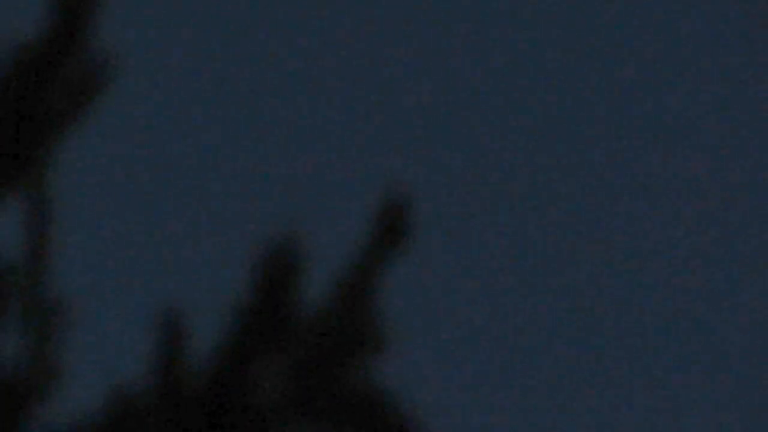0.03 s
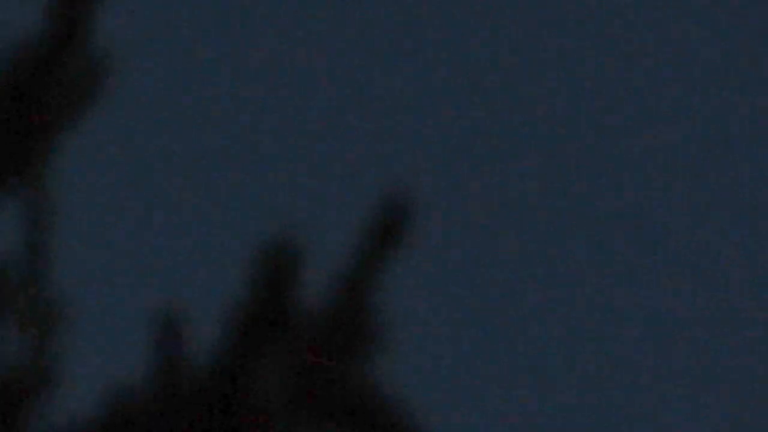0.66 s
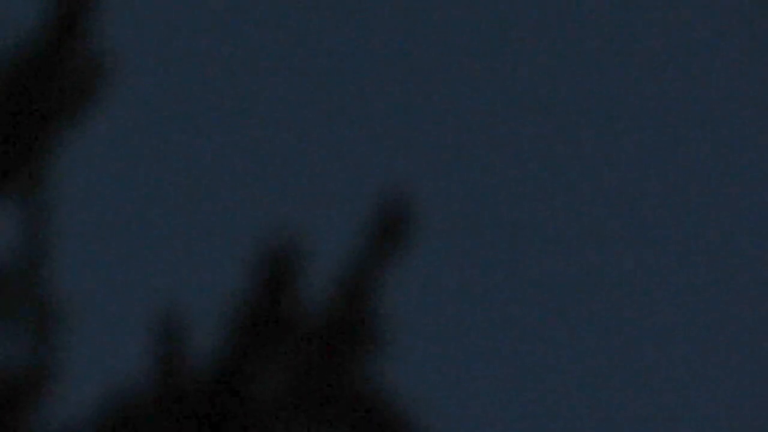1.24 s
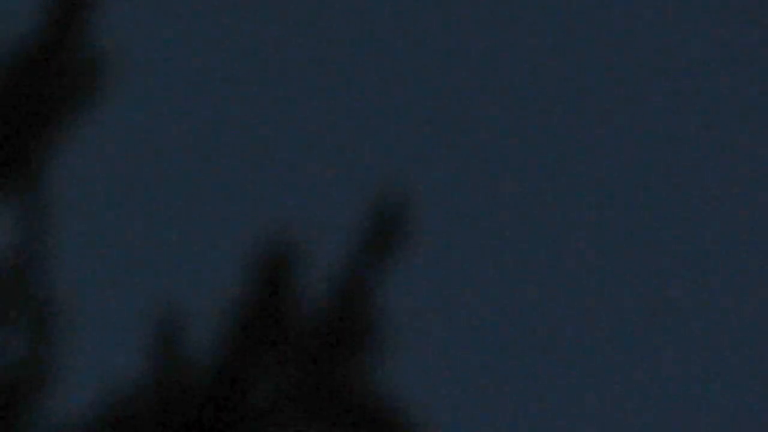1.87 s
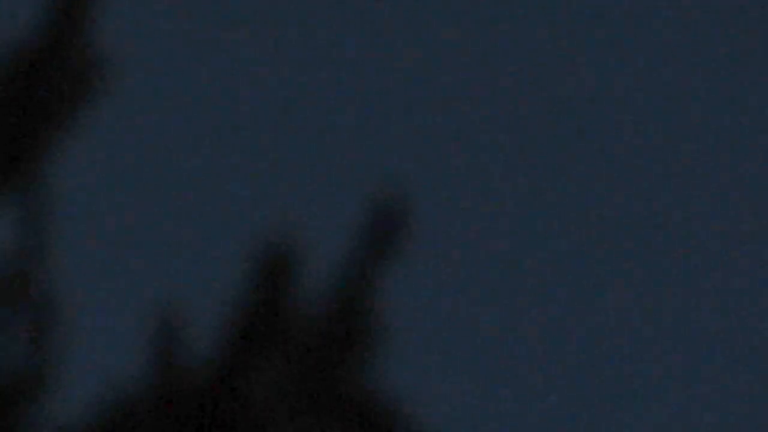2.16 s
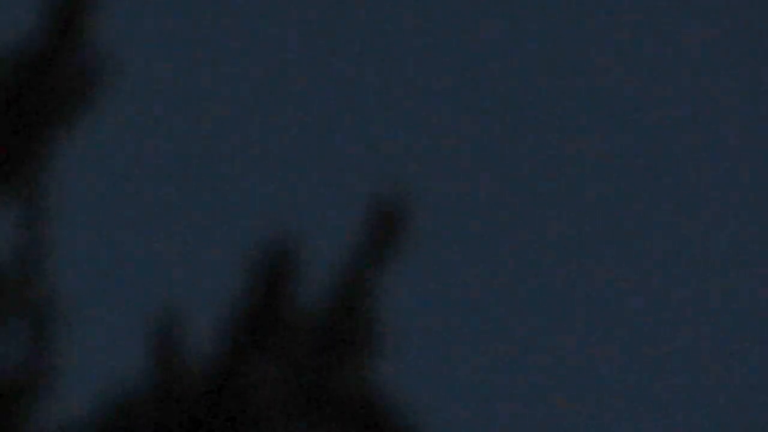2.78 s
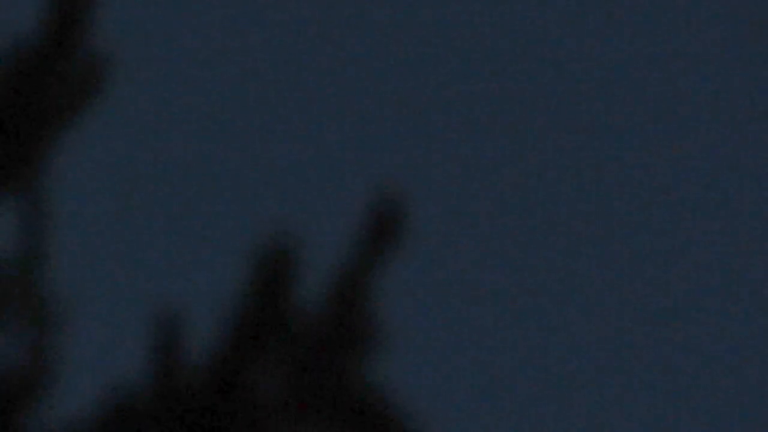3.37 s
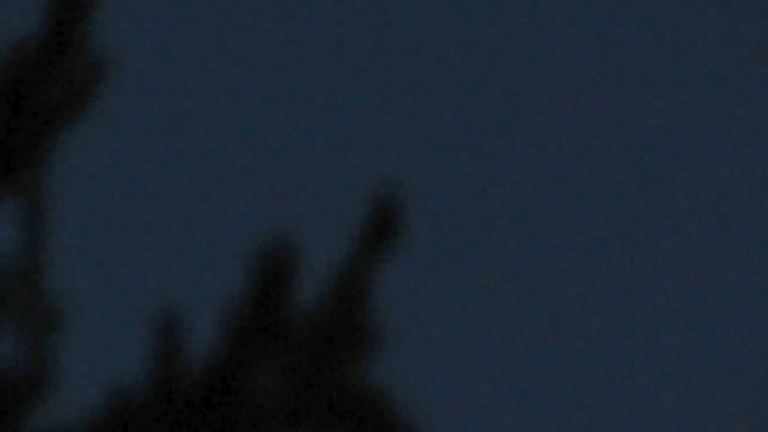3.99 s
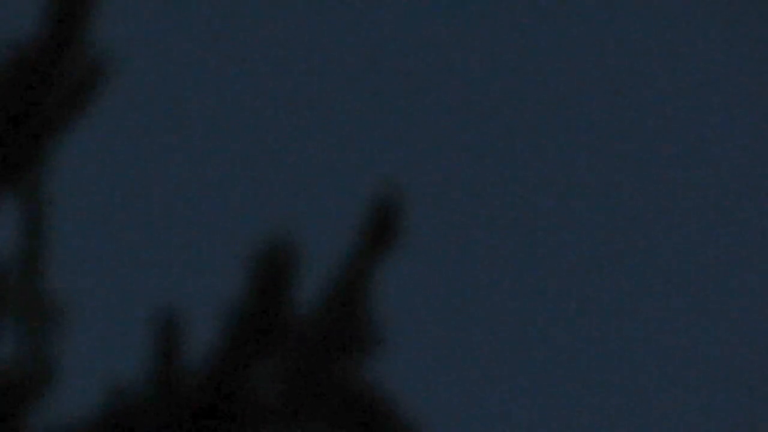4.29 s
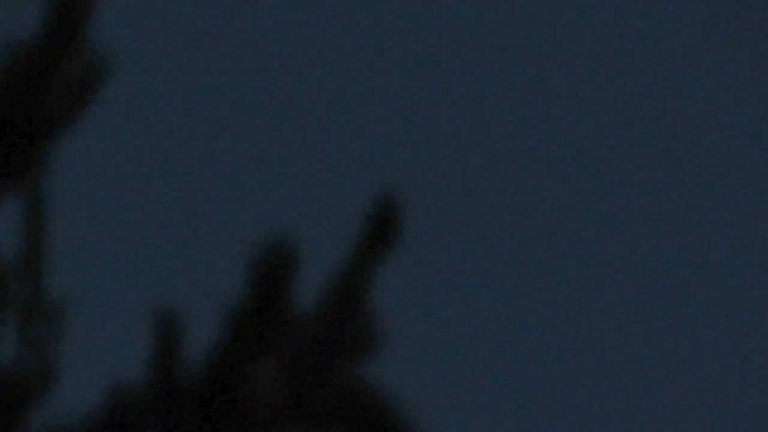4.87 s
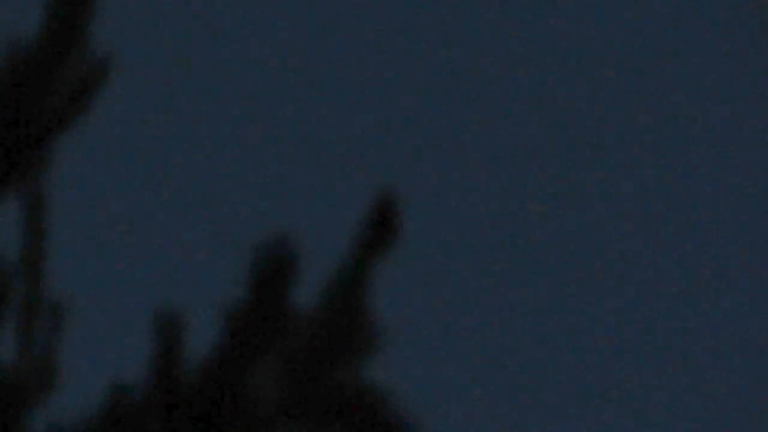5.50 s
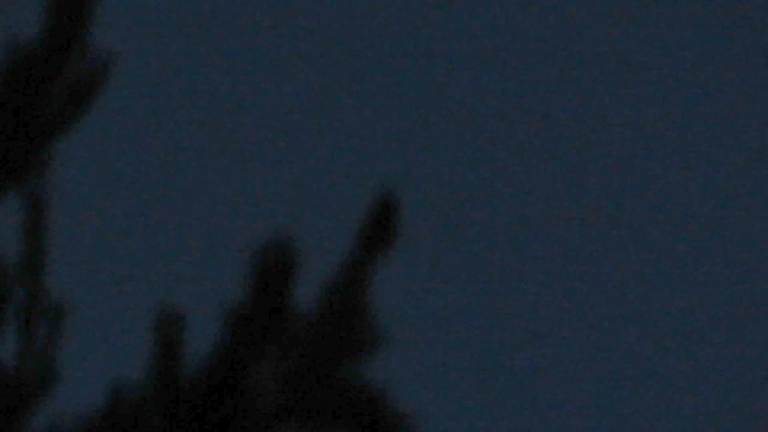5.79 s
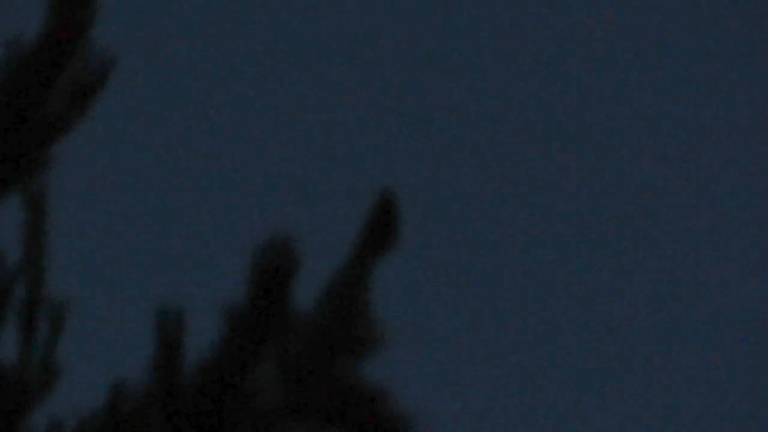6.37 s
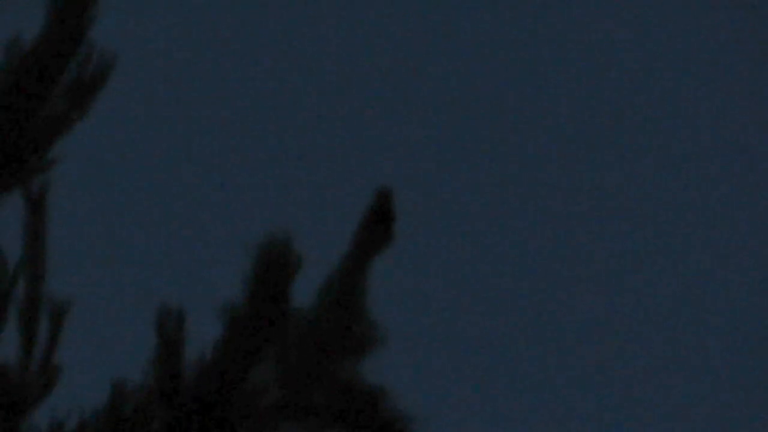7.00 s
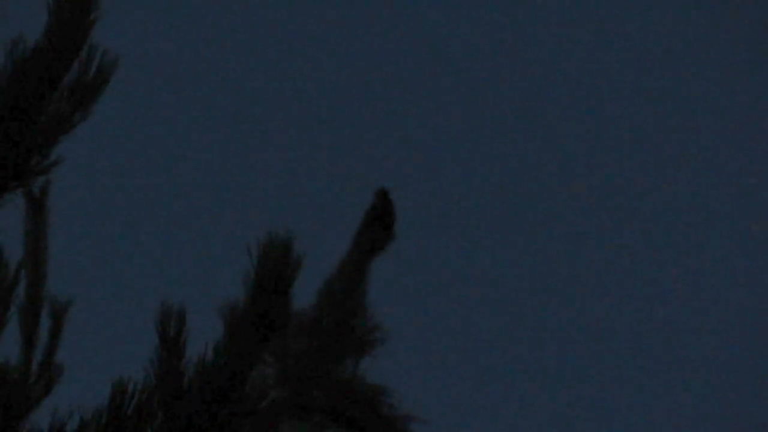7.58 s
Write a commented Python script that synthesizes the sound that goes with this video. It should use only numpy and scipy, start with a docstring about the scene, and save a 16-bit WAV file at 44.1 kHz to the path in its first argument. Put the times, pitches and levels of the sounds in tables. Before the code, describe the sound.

A nightjar churrs without a break for nearly eight seconds, a rapid, even trill of tiny notes with a slight echo from the surrounding trees. From about 0.6 to 1.1 seconds it drops to a softer, lower, quicker trill, then holds the full churr until 7 seconds. It softens again and returns to full strength at about 7.5 seconds.

Close to the microphone, a hand scuffs and knocks on the camera between 1.1 and 1.3 seconds. Small dry ticks and a faint sleeve rustle follow at around 2.1 to 2.4 seconds, with more light ticks from 4.3 to 4.8. Faint bumps come near 3.4 and 5.6 seconds, soft cloth brushing with very faint thin squeaks between 6 and 7, and a last small scuff near 7.4. A steady low rumble and hiss, with a barely audible camera motor hum, continue throughout.

```python
"""Nightjar at dusk

A nightjar churrs from a treetop: a pulse train of tiny falling whistles, about 27 a second, twice
dropping to a softer, lower, quicker trill. Branches reflect each note and the trees scatter it.
Close by, a hand scuffs, knocks and ticks on a camera and a sleeve brushes, over a steady rumble
and hiss and the faint hum of the camera's motor."""
import sys
import numpy as np
from scipy import signal
from scipy.fft import rfft, irfft
from scipy.io import wavfile

SR = 44100
rng = np.random.default_rng(int(sys.argv[2]) if len(sys.argv) > 2 else 0)


def file_out(sig):
    """Save sig as 16-bit WAV at sys.argv[1]."""
    # one column per channel
    cols = np.atleast_2d(sig).T
    # limit, then scale
    lim = np.clip(cols, -1, 1)
    pcm = np.round(lim * 32767).astype(np.int16)
    wavfile.write(sys.argv[1], SR, pcm)


N = 337365
TIME = np.arange(N) / SR


def from_db(db):
    """Amplitude ratio: a factor of ten for every 20 dB."""
    return 10 ** (np.asarray(db) / 20)


def unit_rms(x):
    """Normalisation to unit mean power."""
    return x / np.sqrt(np.mean(x ** 2) + 1e-20)


def curve_at(rows, at):
    """Linear interpolation of a two-column curve."""
    return np.interp(at, *np.transpose(rows))


def noise(spectrum, size=N):
    """Spectral shaping: white noise weighted by rows of frequency_hz, density_db."""
    hz, db = np.transpose(spectrum)
    bins_hz = np.maximum(np.fft.rfftfreq(size, 1 / SR), 1)
    gain = from_db(np.interp(np.log(bins_hz), np.log(hz), db))
    return irfft(rfft(rng.standard_normal(size)) * gain, size) * np.sqrt(SR / 2)


def stereo(mid, side):
    """Sum and difference: left and right from their common and opposed parts."""
    return np.array([mid + side, mid - side])


def wide_noise(spectrum, side_db):
    """Partial coherence: a common noise of unit power and an independent opposed one."""
    return stereo(unit_rms(noise(spectrum)), from_db(side_db) * unit_rms(noise(spectrum)))


def drift(rate_hz):
    """Random modulation: standard normal values joined by straight lines."""
    knots = np.arange(0, TIME[-1] + 1, 1 / rate_hz)
    return np.interp(TIME, knots, rng.standard_normal(len(knots)))


def resonate(x, hz, width_hz):
    """Second-order resonance with unit gain at its peak."""
    radius = np.exp(-np.pi * width_hz / SR)
    feedback = [1, -2 * radius * np.cos(2 * np.pi * hz / SR), radius ** 2]
    return signal.lfilter(np.array([1, 0, -1]) * (1 - radius ** 2) / 2, feedback, x)


# Pace of the "loud" and "soft" manners of churring: notes_per_s, slowing_ratio
CHURR_PACE = {"loud": (27.3, .019), "soft": (37.6, .07)}
# Swell into a loud phrase: time_constant_s, loss_db, fullness_loss
PHRASE_SWELL = (0.077, 3.1, .4)
# Fade out of a loud phrase: time_constant_s, loss_db, fullness_loss
PHRASE_FADE = (0.038, 4.5, .35)

def phrase(first_s, last_s, manner, opening_db, closing_db):
    """A slightly slowing pulse train: rows of time_s, level_db, fullness (vocal effort, 0 to 1)."""
    rate, slowing = CHURR_PACE[manner]
    progress = np.linspace(0, 1, round((last_s - first_s) * rate) + 1)
    time_s = first_s + (last_s - first_s) * (progress - slowing * progress * (1 - progress) / 2)
    level_db = opening_db + (closing_db - opening_db) * progress
    if manner == "loud":
        fullness = .96
        edges = (time_s - first_s, PHRASE_SWELL), (last_s - time_s, PHRASE_FADE)
        for from_edge_s, (ease_s, loss_db, thinning) in edges:
            slack = np.exp(-from_edge_s / ease_s)
            level_db = level_db - loss_db * slack
            fullness = fullness - thinning * slack
    else:
        fullness = .023 + .12 * progress  # the soft trill climbs in pitch
    return np.column_stack([time_s, level_db, np.clip(fullness, 0, 1)])


# Phrases, sung without a break: first_note_s, last_note_s, manner, opening_db, closing_db
SONG_PHRASES = [(-.1612, .5362, "loud", -22, -22.8), (.5753, 1.079, "soft", -33, -27.3),
                (1.1083, 6.9666, "loud", -22, -23), (6.9948, 7.4205, "soft", -29, -26.8),
                (7.4533, 7.814, "loud", -22, -22.5)]
# The bird pushes and drags the beat in its long phrase: time_s, lag_s
BEAT_LAG = [(1.11, 0), (2.09, -.0025), (2.3, -.0052), (3.19, .002), (4.06, .0028), (5.05, .002),
            (5.93, .0009), (6.82, .0057), (6.97, 0)]

def song(swallowed_s=7.151, swallowed_loss_db=8):
    """Timing modulation: the phrases follow a wandering beat, and one note is nearly swallowed."""
    notes = np.vstack([phrase(*row) for row in SONG_PHRASES])
    time_s, level_db, fullness = notes[notes[:, 0] > 0].T
    level_db[np.argmin(abs(time_s - swallowed_s))] -= swallowed_loss_db
    return np.array([time_s + curve_at(BEAT_LAG, time_s), level_db, fullness])


# Contour of a full note, a short hook and a plunge: age_s, pitch_hz
NOTE_CONTOUR = [(0, 2470), (.0012, 2670), (.0022, 2730), (.0032, 2610), (.0042, 2440), (.0062, 2130),
                (.0082, 1740), (.0102, 1400), (.0122, 1260), (.015, 1130)]
# Standard deviations from note to note: length_ratio, span_ratio, level_db, timing_s
NOTE_SPREAD = (.07, .024, .5, .0002)
# Time a note takes to open: weak_s, full_s
NOTE_ATTACK = (.0036, .0015)
# The whistle is loudest in the middle of its range: pitch_hz, gain_db
WHISTLE_RESPONSE = [(1130, -50.5), (1250, -22), (1400, -13), (1760, -8), (2140, 1), (2450, -4.5),
                    (2750, -5)]
# Faint overtones at the top of the sweep: harmonic_number, level_db
WHISTLE_HARMONICS = [(2, -25), (3, -30.5), (5, -33)]
# Two throat resonances and the hollow between them: centre_hz, width_hz, gain_db
THROAT_FORMANTS = [(2258, 39, 3.5), (2307, 35, -1), (2629, 69, 4.5)]

def nightjar():
    """Source and filter: a whistle sweeps down about an octave in 10 ms, through fixed resonances."""
    centre_s, level_db, fullness = song()[:, :, None]
    spread = rng.standard_normal((len(centre_s), 4)) * NOTE_SPREAD
    stretch, detune, accent_db, late_s = spread.T[:, :, None]
    # with more effort a note starts earlier and higher, and lasts longer
    lead_s = np.interp(fullness, (0, 1), (.0042, .0062))
    span_ratio = np.interp(fullness, (0, 1), (.738, 1)) * (1 + detune)
    length_ratio = np.interp(fullness, (0, 1), (.889, 1)) * (1 + stretch)
    age = np.arange(SR // 55) / SR
    sweep_hz = curve_at(NOTE_CONTOUR, age / length_ratio)
    lowest_hz = NOTE_CONTOUR[-1][1]
    pitch_hz = lowest_hz + (sweep_hz - lowest_hz) * span_ratio
    # a relaxed throat favours lower pitches and opens more gently
    throat_ratio = np.interp(fullness, (0, 1), (.92, 1))
    response_db = curve_at(WHISTLE_RESPONSE, pitch_hz / throat_ratio)
    attack_s = np.interp(fullness, (0, 1), NOTE_ATTACK)
    opening = np.sin(np.pi / 2 * np.clip(age / attack_s, 0, 1)) ** 2
    phase = 2 * np.pi * np.cumsum(pitch_hz, axis=1) / SR
    # overtones belong to the forceful top of the note
    force = (pitch_hz / sweep_hz.max()) ** 3
    overtones = force * sum(from_db(db) * np.sin(k * phase) for k, db in WHISTLE_HARMONICS)
    notes = (np.sin(phase) + overtones) * opening * from_db(level_db + response_db + accent_db)
    samples = np.round((centre_s - lead_s + late_s) * SR).astype(int) + np.arange(len(age))
    voice = np.bincount(np.clip(samples, 0, N).ravel(), notes.ravel(), N + 1)[:N]
    colour = sum((from_db(db) - 1) * resonate(voice, hz, width) for hz, width, db in THROAT_FORMANTS)
    return voice + colour


# Reflections from nearby branches: delay_s, gain_db
BRANCH_ECHOES = [(.0034, -11.5), (.0083, -20), (0.012, -20), (0.022, -25.5), (0.028, -26)]
# Spectrum of the scatter from the trees: frequency_hz, relative_db
TREE_SPECTRUM = [(1000, 32), (1400, -7), (1900, -3.5), (2250, 2), (2420, 7), (2650, 10), (3000, 12),
                 (6000, -17), (14000, -12)]

def woodland(voice, scatter_db=-14.5, side_db=-4.5, t60_s=.79, sway_s=.00039, pan_db=.6):
    """Reflection and scattering: swaying branches return echoes, and the trees a diffuse tail."""
    echoes = np.zeros(N)
    for delay_s, db in BRANCH_ECHOES:
        emitted_s = TIME - delay_s - sway_s * drift(.97)
        echoes += from_db(db) * np.interp(emitted_s, TIME, voice, left=0)
    age = np.arange(SR) / SR
    fade = from_db(-60 * age / t60_s) * np.clip(age * 100, 0, 1)
    tails = [signal.fftconvolve(voice, noise(TREE_SPECTRUM, size=SR) * fade)[:N] for _ in range(2)]
    mid, side = [unit_rms(tail) * np.std(voice) * from_db(scatter_db) for tail in tails]
    return stereo(voice + echoes + mid, side * from_db(side_db)) * from_db([[-pan_db], [pan_db]])


# Faint hum of the camera's motor: centre_hz, width_hz, rms_db
MOTOR_BANDS = [(495.4, 29, -73), (586.6, 17, -67), (773.5, 63, -64)]

def motor_hum():
    """Narrow-band noise: the camera's motor hums faintly at three unsteady pitches."""
    hum = np.zeros(N)
    for hz, width_hz, db in MOTOR_BANDS:
        band = resonate(rng.standard_normal(N), hz, width_hz)
        hum += from_db(db) * unit_rms(resonate(band, hz, width_hz))
    return hum


# Spectral density of night air and microphone hiss: frequency_hz, common_db, opposed_db
AIR_SPECTRUM = [(15, -79.5, -85), (33.4, -72, -79), (44, -73.5, -77), (57, -67, -64), (82, -74, -85.5),
                (101.7, -74, -71), (176.5, -83.5, -70.5), (382, -84, -74), (780, -85.5, -79),
                (1036, -89, -83.5), (1980, -78, -84.5), (2870, -92.5, -91.5), (6060, -96, -96.5),
                (8660, -100, -101), (11400, -104, -105), (13600, -110, -111), (15300, -122, -123)]

def night_air():
    """Stationary noise: broadband rumble and hiss, wide in the low middle."""
    air = np.array(AIR_SPECTRUM)
    return stereo(noise(air[:, [0, 1]]), noise(air[:, [0, 2]]))


def bursts(starts_s, levels_db, t60s, attack_s=.0004):
    """Incoherent addition: the envelope of quickly rising, decaying contacts whose powers sum."""
    power = np.zeros(N + SR)
    age = np.arange(SR // 8) / SR
    rise = 1 - np.exp(-age / attack_s)
    for start_s, db, t60_s in zip(starts_s, levels_db, t60s):
        start = int(start_s * SR)
        power[start:start + len(age)] += (from_db(db - 60 * age / t60_s) * rise) ** 2
    return np.sqrt(power[:N])


# Scuffs of the hand: slip_s, run_up_s, relative_db, thud_offset_db, hiss_offset_db, t60_s
HAND_SCUFFS = [(1.14, .014, -19.5, -4, 0, .025), (1.1745, .005, -27, -9, 0, .035),
               (1.2525, .018, -20.5, -4, 2, .025), (1.281, .004, -35, 0, 4, .025),
               (2.3627, 0, -44, 3, 0, .03), (3.356, 0, -45, -6, -8, .071), (3.395, 0, -47, -2, -8, .049),
               (5.526, 0, -50, -1, -8, .03), (5.564, 0, -42, -1, -9, .041), (7.42, 0, -29, -17, -11, .05),
               (7.461, .015, -33, -18, -9, .03)]

def jerks(spacing_s=.005, jitter_s=.0006, spread_db=3, run_up_loss_db=3, run_up_t60_s=.019,
          trail_s=.006, trail_loss_db=8):
    """Stick-slip motion: a run-up of weak jerks, if any, then one firm slip and two dying ones."""
    rows = []
    for slip_s, run_up_s, db, thud_db, hiss_db, t60_s in HAND_SCUFFS:
        for early_s in np.linspace(run_up_s, 0, round(run_up_s / spacing_s), endpoint=False):
            late_s, accent_db = rng.standard_normal(2) * (jitter_s, spread_db)
            jerk_db = db - run_up_loss_db + accent_db
            rows.append((slip_s - early_s + late_s, jerk_db, thud_db, hiss_db, run_up_t60_s))
        for k in range(3):
            rows.append((slip_s + k * trail_s, db - k * trail_loss_db, thud_db, hiss_db, t60_s))
    return rows


# Rasp of skin on the housing: frequency_hz, relative_db
RASP_SPECTRUM = [(300, -15), (1200, -5.5), (2500, 2), (3400, 0), (4400, -2.5), (5900, 0.5), (6900, -3.5),
                 (9000, -19), (15000, -50)]
# Bright friction hiss, of skin and of cloth: frequency_hz, relative_db
HISS_SPECTRUM = [(3000, -35), (6500, -9), (8700, 3), (11000, -2), (13500, -6.5), (15500, -31)]
# Thud of the camera body: frequency_hz, relative_db
THUD_SPECTRUM = [(60, -22), (150, -14), (450, -13), (720, -10), (1020, 1), (1400, -6), (1900, 1),
                 (2700, -1), (3800, -16), (8000, -35)]

def scuffs(rasp_gain_db=2.5, thud_gain_db=5, grain_db=1):
    """Friction noise: each jerk of skin on the housing excites a grainy rasp, a hiss and a thud."""
    start_s, db, thud_db, hiss_db, t60_s = np.transpose(jerks())
    grain = from_db(grain_db * drift(2000))
    rasp = wide_noise(RASP_SPECTRUM, side_db=-16) * bursts(start_s, db + rasp_gain_db, t60_s)
    hiss = wide_noise(HISS_SPECTRUM, side_db=-7) * bursts(start_s, db + hiss_db, t60_s)
    thud = wide_noise(THUD_SPECTRUM, side_db=-25) * bursts(start_s, db + thud_db + thud_gain_db, t60_s)
    return (rasp + hiss) * grain + thud


# Modes of the housing: frequency_hz, level_db, t60_s
HOUSING_MODES = [(610, -16, .045), (790, -11, .04), (1020, -8, .025), (1450, -8, .01), (1880, -2, .01),
                 (2600, -5, .008), (5900, -8, .005)]
# A finger strikes the housing: start_s, gain_db
FINGER_KNOCKS = [(1.1405, -16.5), (1.1745, -35), (1.2535, -25), (1.286, -34), (2.366, -36), (5.566, -42)]

def knocks():
    """Modal ringing: a hard contact sets the housing vibrating as a sum of damped sinusoids."""
    out = np.zeros(N)
    age = np.arange(SR // 20) / SR
    ring = sum(from_db(db - 60 * age / t60_s) * np.cos(2 * np.pi * hz * age)
               for hz, db, t60_s in HOUSING_MODES)
    for start_s, db in FINGER_KNOCKS:
        start = int(start_s * SR)
        out[start:start + len(ring)] += from_db(db) * ring
    return out


# Small dry ticks of the housing: start_s, relative_db, centre_hz, t60_s, rebound_db
HOUSING_TICKS = [(1.678, -48, 5070, 0.017, -2), (1.89, -42, 8000, 0.0092, -10),
                 (2.2395, -33, 8500, 0.009, -12), (2.3004, -24.5, 7870, 0.0045, -22),
                 (2.363, -37, 9000, .015, -4), (2.379, -46, 10400, .012, -8), (4.259, -40, 8450, .01, 3.5),
                 (4.317, -32, 8700, 0.0073, -7), (4.364, -37, 8500, 0.006, 2.5),
                 (4.431, -50, 12000, 0.0093, -8), (4.738, -42.5, 9700, 0.0091, 5.5),
                 (4.8098, -41.5, 7500, 0.0084, 8.5), (5.603, -42, 7960, 0.012, -8),
                 (6.688, -40, 8140, 0.011, -18)]

def ticks(width_hz=8500, side_db=-8, gain_db=2.5, rebound_s=.003, cutoff_hz=11500):
    """Impact and rebound: two brief contacts in quick succession make a bright, broadband click."""
    out = np.zeros((2, N))
    age = np.arange(SR // 20) / SR
    for start_s, db, hz, t60_s, rebound_db in HOUSING_TICKS:
        mid, side = unit_rms(resonate(rng.standard_normal((2, len(age))), hz, width_hz))
        impact = from_db(-60 * age / t60_s)
        rebound = from_db(rebound_db) * np.interp(age - rebound_s, age, impact, left=0)
        envelope = np.hypot(impact, rebound) * from_db(gain_db + db)
        start = int(start_s * SR)
        out[:, start:start + len(age)] += stereo(mid, side * from_db(side_db)) * envelope
    return signal.sosfilt(signal.butter(2, cutoff_hz, fs=SR, output="sos"), out)


# Strokes of a sleeve: middle_s, half_length_s, brush_db, hiss_db
SLEEVE_STROKES = [(2.122, 0.052, -56, -52.5), (2.33, 0.31, -52, -60.5), (3.376, 0.036, -50, -70),
                  (5.098, 0.15, -62, -70), (6.125, 0.05, -52, -64), (6.338, 0.11, -53, -59),
                  (6.72, .08, -53.5, -66)]
# Soft brushing of cloth: frequency_hz, relative_db
CLOTH_SPECTRUM = [(100, -8), (300, 16.5), (700, 12), (1500, 9), (4000, 5.5), (7000, 2), (9500, -4),
                  (13500, 1), (15500, -20)]

def sleeve(grain_db=2.5, catch_db=2.5):
    """Sliding friction: the noise of each stroke swells and ebbs, roughened as fibres catch."""
    middle_s, half_s, brush_db, hiss_db = np.transpose(SLEEVE_STROKES)
    distance = (TIME - middle_s[:, None]) / half_s[:, None]
    swells = np.exp(-np.minimum(distance ** 2, 20))
    brush = wide_noise(CLOTH_SPECTRUM, side_db=-9) * (from_db(brush_db) @ swells)
    hiss = wide_noise(HISS_SPECTRUM, side_db=-8) * (from_db(hiss_db) @ swells)
    return (brush + hiss) * from_db(grain_db * drift(400) + catch_db * drift(45))


# Thin, faint squeaks: start_s, length_s, first_hz, last_hz, level_db
SQUEAK_GLIDES = [(3.289, 0.14, 7800, 8900, -61), (3.307, 0.32, 10200, 11400, -66),
                 (6.17, 0.16, 8800, 9300, -68), (6.29, 0.11, 9800, 10830, -55),
                 (6.418, 0.22, 10000, 10900, -64), (6.76, 0.11, 10600, 10100, -67),
                 (6.809, 0.093, 4430, 4500, -56)]

def squeaks(waver_hz=190, flutter_db=4.5):
    """Frequency and amplitude modulation: high gliding tones waver and flutter at random."""
    out = np.zeros(N)
    waver = waver_hz * drift(500)
    for start_s, length_s, first_hz, last_hz, db in SQUEAK_GLIDES:
        sounding = (TIME > start_s) & (TIME < start_s + length_s)
        progress = (TIME[sounding] - start_s) / length_s
        pitch_hz = first_hz + (last_hz - first_hz) * progress + waver[sounding]
        phase = 2 * np.pi * np.cumsum(pitch_hz) / SR
        out[sounding] += from_db(db) * np.sin(np.pi * progress) * np.sin(phase)
    return out * from_db(flutter_db * drift(60))


def scene():
    """Superposition: the bird among the trees, handling and motor close by, the night air behind."""
    handling = scuffs() + knocks() + ticks() + sleeve() + squeaks()
    return woodland(nightjar()) + handling + motor_hum() + night_air()


# Two narrow notches the camera filters out of the sound: centre_hz, width_hz
CAMERA_NOTCHES = [(3950, 265), (7900, 155)]

def record(dry, cutoff_hz=15300):
    """Linear filtering: the camera's two notches colour the sound and a low-pass cuts the top."""
    for hz, width_hz in CAMERA_NOTCHES:
        dry = signal.lfilter(*signal.iirnotch(hz, hz / width_hz, fs=SR), dry)
    return signal.sosfilt(signal.ellip(10, .2, 80, cutoff_hz, fs=SR, output="sos"), dry)


dry = scene()
out = record(dry)
file_out(out)
```